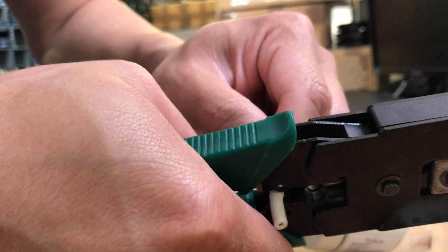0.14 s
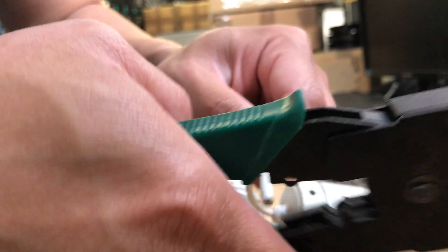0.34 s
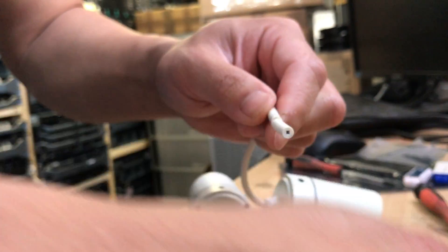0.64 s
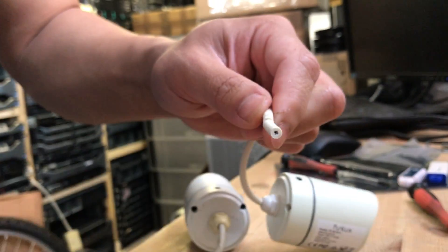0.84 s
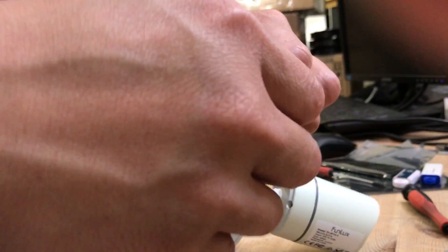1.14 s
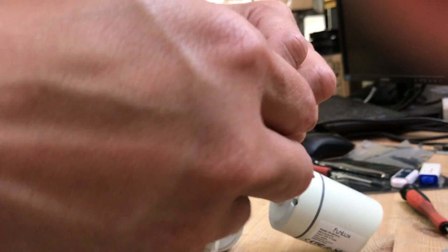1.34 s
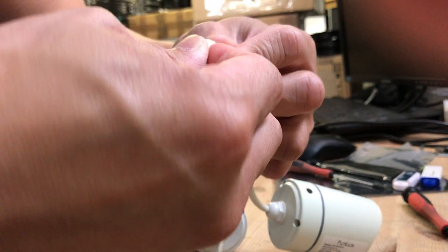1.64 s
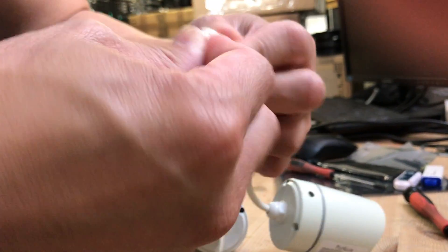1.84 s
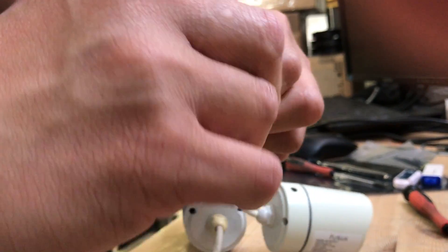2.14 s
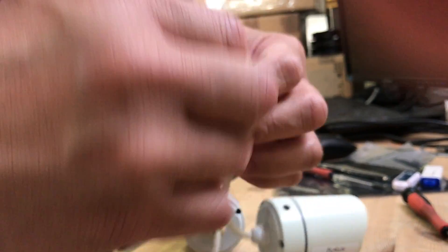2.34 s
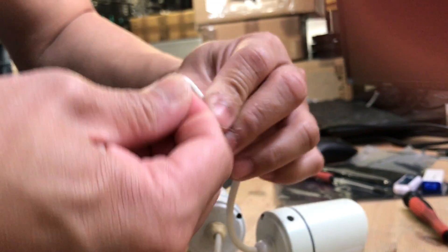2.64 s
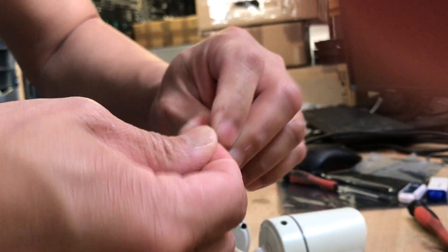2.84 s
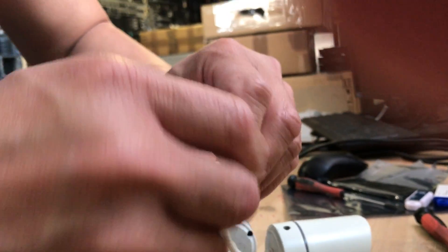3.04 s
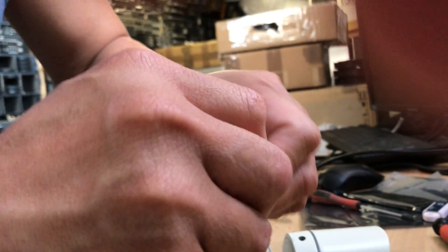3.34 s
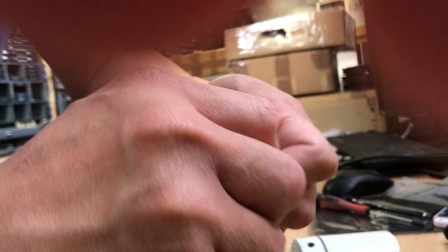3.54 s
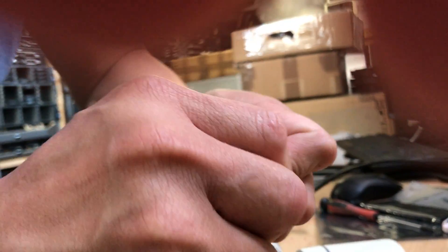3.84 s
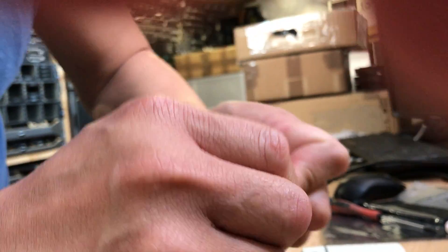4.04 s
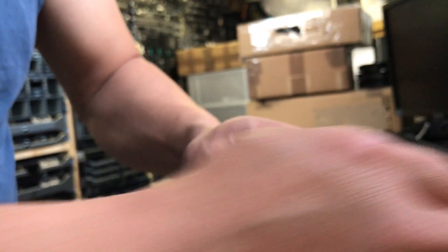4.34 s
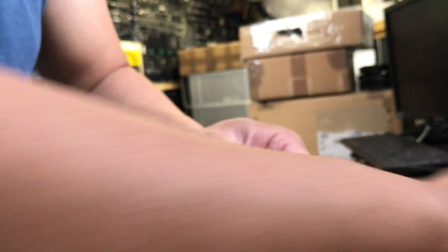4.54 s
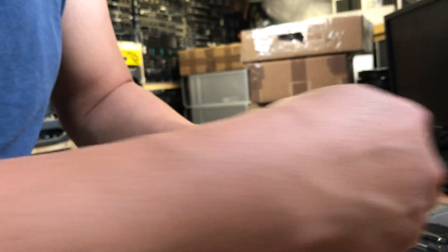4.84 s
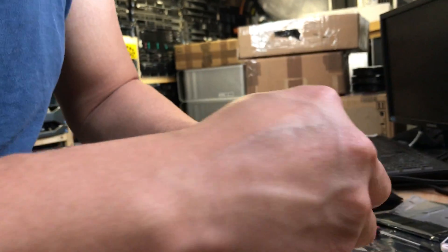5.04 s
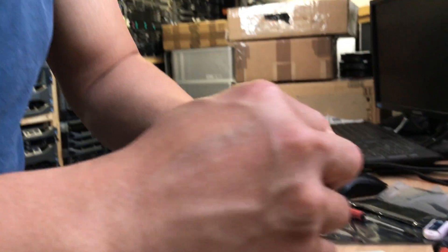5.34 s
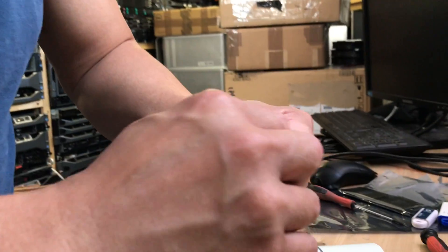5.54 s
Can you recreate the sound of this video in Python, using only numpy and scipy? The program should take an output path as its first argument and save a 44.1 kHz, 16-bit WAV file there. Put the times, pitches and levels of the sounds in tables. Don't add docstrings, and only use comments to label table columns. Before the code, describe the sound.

A quiet workroom with soft fan air and a faint low hum throughout, heard close on a phone microphone with a short dry echo. From 0 to 0.8 s only a few tiny dry fingernail ticks. At about 0.82 s a light metallic click, then at 0.86 s a padded tool handle knocks a wooden bench with a dull thud. Around 1.0 to 1.14 s comes the loudest event: a bounce and a dense burst of steel jaw clacks, spring rattle and low board boom. Faint skin rustle fades by 1.5 s, with a small tick at 1.46 s. At 2.5 s a hollow plastic housing makes a quick double knock, with weak taps after and another softer knock at 2.9 s. Sparse faint ticks follow. Soft muted bumps come at 4.0, 4.2 to 4.33, 4.75 and 4.96 s, with dry clicks near 4.3 s. A tiny plastic snap ends it at 5.6 s.

```python
import sys
import numpy as np
from scipy import signal
from scipy.fft import rfft, irfft
from scipy.io import wavfile
from scipy.ndimage import uniform_filter1d

SR = 44100
rng = np.random.default_rng(int(sys.argv[2]) if len(sys.argv) > 2 else 0)


def boost_factor(decibels):
    exponent = np.asarray(decibels, float) / 20
    return 10 ** exponent


def generate_wav(signal):
    frames = np.transpose(np.atleast_2d(signal))
    scaled = np.clip(frames, -1, 1) * 32767
    pcm = np.round(scaled).astype(np.int16)
    wavfile.write(sys.argv[1], SR, pcm)


N = 250311

# frequency in Hz, level in dB per Hz.
AIR = [(20, -44), (35, -20), (52, 3), (82, -20.5), (110, -14.5), (160, -17.5), (400, -18), (800, -20.5),
       (1300, -21.5), (2500, -26), (4200, -31.5), (5200, -37), (8000, -41.5), (15300, -41)]
# centre in Hz, width in Hz, level in dB.
FAN_BANDS = [(56, 15.8, 7), (103.3, 18, 9), (333.4, 33.3, 11.5), (370.3, 28.3, 5.5), (611.5, 29.3, 13),
             (971, 94, 7.5), (1179, 67, 8.5), (1465, 14, 5.5), (2470, 41, 0), (3440, 41, 12),
             (3662, 12, 12.5), (3750, 1000, 1), (6000, 25, 8.5), (6040, 1300, 3.5), (10570, 570, -8)]
# frequency in Hz, t60 in seconds.
ROOM = [(120, 0.3), (400, 0.12), (1200, .15), (4000, 0.15), (12000, 0.094), (15500, .04)]
# frequency in Hz, level in dB per Hz.
CLOTH = [(1500, -14), (3000, 0), (6000, -0.5), (10000, -5), (15000, -5), (16500, -8.5)]
# start in seconds, length in seconds, level in dB, swell in dB.
RUSTLE_STROKES = [
    (0.757, 0.28, -73, 8),
    (1.13, 0.356, -71.5, 8),
    (2.65, 0.14, -76, -6),
    (2.495, .04, -63, -8),
]
# start in seconds, level in dB, centre in Hz.
NAILS = [(.1145, -55, 8000), (.31, -58, 10000), (.68, -57, 7100), (1.462, -55, 6000), (1.812, -66, 5000),
         (2.475, -55, 12000), (4.195, -64, 8000), (4.894, -63, 7500), (2.703, -60, 9500),
         (2.714, -52, 9000), (2.848, -58, 11000), (2.868, -48, 7000), (3.005, -60, 9000), (3.1, -64, 10000),
         (3.245, -57, 9000), (4.27, -48, 9600), (4.315, -53, 8000), (4.3257, -49.5, 8000),
         (4.82, -61, 9000), (5.5927, -47, 5000)]
# start in
# seconds, level in dB, centre in Hz, t60 in seconds.
SPRINGS = [(5.596, -48, 3000, .055), (0.82, -33, 5500, 0.0072), (.917, -37.5, 10300, 0.014),
           (.98, -48, 11000, .01), (.987, -38, 4500, 0.03), (.998, -47, 13000, .012),
           (1.097, -35, 10900, 0.011), (1.1314, -12.5, 1800, 0.0038), (4.271, -35, 1700, 0.0045),
           (4.327, -43, 1200, 0.014)]
# start in seconds, level in dB, centre in Hz, t60 in seconds.
PINGS = [(1.0645, -29, 15500, .016), (1.042, -36, 11200, .012), (.9125, -58, 14000, .008),
         (1.1345, -36, 5100, 0.014), (1.46, -42, 2050, 0.021), (1.4605, -42, 2550, .018),
         (1.461, -54, 4300, 0.014), (2.4945, -25, 4450, .012), (2.508, -52, 4150, .045),
         (.988, -46, 5400, .015), (2.878, -62, 12500, .02), (2.4945, -46, 7600, .014),
         (2.902, -57, 4270, 0.03), (2.868, -50, 2700, 0.011), (3.515, -59, 7000, 0.013),
         (3.67, -65, 7000, .012), (5.531, -60, 4300, 0.0094)]
# start in seconds, level in dB, ring in Hz, t60 in seconds.
BUMPS = [(2.497, -24, 200, .07), (.822, -40, 95, .06), (4.272, -40, 90, .05), (4.326, -42, 110, .05),
         (1.45, -53, 200, 0.093), (0.821, -29.5, 695, 0.015), (3.245, -44, 130, 0.063),
         (3.787, -44, 355, 0.05), (3.995, -34, 545, 0.037), (4.005, -47.5, 195, 0.11),
         (4.178, -40, 130, 0.052), (4.21, -36, 540, 0.062), (4.219, -35.5, 325, 0.077),
         (4.234, -36, 580, 0.025), (4.271, -32, 250, 0.019), (4.309, -36, 330, 0.07),
         (4.324, -32.5, 260, 0.026), (4.748, -40.5, 610, 0.011), (4.75, -31.5, 349, 0.056),
         (4.762, -44, 192, 0.14), (4.894, -45, 327, 0.063), (4.959, -33.5, 550, 0.038),
         (5.532, -47.5, 179, 0.096), (5.573, -52, 250, .05)]
# start in seconds, level in dB, ring in Hz, t60 in seconds.
BOOMS = [(.872, -16, 128, .1), (.89, -26, 150, .04), (1.066, -7, 320, .035), (1.011, -18, 190, 0.11),
         (1.042, -12, 190, 0.036), (1.062, -12, 125, .11), (1.0673, -0.5, 191, 0.046),
         (1.085, -9.5, 170, .045), (1.104, -21, 174, 0.037), (1.123, -11, 203, 0.047),
         (1.134, -17.5, 160.3, 0.073), (1.09, -25.5, 57.3, 0.23)]
# frequency in Hz, level in dB, t60 in seconds.
CLIP = [(2385, -32, 0.008), (1270, -47, 0.011), (820, -44, 0.0076), (3740, -49, .008), (6070, -43, 0.005)]
# frequency in Hz, level in dB, t60 in seconds, rise in ms.
HANDLE = [(68.5, -39.5, 0.24, 17), (143, 1, .09, 18), (190, 5.5, 0.06, 9.6), (260, -5.5, 0.047, 7.1),
          (325, -9, 0.087, 4.8), (536, -3, 0.041, 0.81), (619, 0, 0.033, 4.3), (723, 0, 0.042, 2.6),
          (900, -8, 0.046, 1), (1097, -14, 0.06, .8), (1505, -22, 0.085, 0.9), (1800, -43.5, .03, .6),
          (2430, -21.5, 0.01, 0.45)]
# frequency in Hz, level in dB, t60 in seconds, rise in ms.
JAWS = [(296, 0, 0.054, 0.83), (329, 0.5, 0.051, 1), (462, -7, 0.056, 2.4), (596.5, -2, 0.047, 1.4),
        (717, -5, 0.045, 1.8), (917, -3, 0.054, 1.3), (1107, -6.5, 0.048, 2.3), (1150, -2, 0.035, 0.91),
        (1366, -12, 0.062, 0.67), (1640, -7.5, 0.05, 0.25), (1750, -0.5, 0.02, 0.41),
        (2085, -10.5, 0.021, 0.26), (2350, -12, 0.046, 0.37), (2700, -18.5, 0.046, 0.37),
        (3184, -16.5, 0.037, 0.44), (3835, -22, 0.082, .4), (4270, -20, 0.054, .4),
        (5280, -21.5, 0.031, .3), (6440, -38, 0.018, .3), (11400, -31.5, 0.01, .3), (15300, -27, 0.008, .3)]
# frequency in Hz, level in dB, t60 in seconds, rise in ms.
HOUSING = [(85, -30, 0.14, 15), (136, -24.5, 0.17, 19), (210, -12, 0.08, 8.5), (338.3, -2.5, 0.077, 3.1),
           (460, -11.5, 0.071, 1.9), (545, 4, 0.033, 2.5), (638, 5.5, 0.015, 1.04), (830, -12, 0.035, 0.94),
           (963, 1.5, 0.035, 3.3), (1066, -2.5, 0.059, 2.9), (1250, -18, 0.066, 0.74),
           (1467, -20.5, 0.06, 1.1), (1674, -18, 0.05, .8), (1883, -14.5, 0.032, 0.31),
           (2170, -20, 0.024, 0.35), (2510, -31, 0.038, 0.43)]
# frequency in Hz, level in dB per Hz.
CRACK = [(470, -28.5), (800, -4.5), (1970, -8), (4710, -13), (5990, -5), (6800, -14.5), (8020, -24),
         (11100, -21), (14500, -26.5), (15500, -17.5), (16500, -29)]
# frequency in Hz, level in dB per Hz.
THUD = [(500, -30), (900, -10), (2000, -6), (4500, 2), (6000, -20), (8000, -15), (15500, -26)]
# start in seconds, level in dB, bass in dB, tilt in dB per octave, crack in dB.
HANDLE_BLOWS = [
    (0.8504, -38.5, -9, -7.5, -15),
    (0.8637, -9.5, -10, -5, -20),
    (0.8669, -16, -9, -7, -11),
    (1.0042, -22.5, -8, -1.5, -33),
]
# start in seconds, level in dB, bass in dB, tilt in dB per octave, crack in dB.
JAW_BLOWS = [(1.04, -15, 3, 0.79, -5), (1.044, -16, -7, 0.35, -13), (1.064, -16, 11, 1.2, 1.5),
             (1.067, -10, -6, 0.85, -14), (1.0719, -19, -1.5, -0.78, -14), (1.076, -19, 11, -0.95, -24),
             (1.088, -23.5, 0, -1.3, -11), (1.123, -23, -10, .1, -22), (1.1318, -17, -10, 1.8, -9),
             (1.14, -29.5, 7, -0.72, -3)]
# start in seconds, level in dB, bass in dB, tilt in dB per octave, crack in dB.
HOUSING_BLOWS = [(2.4933, -14, 7.5, 0.8, -41), (2.5054, -19, 13, 2.5, -31), (2.518, -36, 2, 4, -25),
                 (2.579, -45, -5, -11, -35), (2.587, -37.5, -2, -6.5, -30), (2.613, -40.5, 6, -4, -28),
                 (2.898, -22.5, -2, -2.5, -38), (2.905, -26, -1, -0.5, -34)]
LOOSE = {"handle": .15, "jaws": .3, "housing": .05}
CHATTER_MS = {"handle": 2.5, "jaws": 2.7, "housing": 2.6}


def evened(x):
    return x / np.sqrt(np.mean(x ** 2) + 1e-20)


def read(points, hz):
    f, value = np.transpose(points)
    return np.interp(np.log(hz + 1), np.log(f + 1), value)


def add(mix, s, sound):
    part = mix[round(s * SR):][:len(sound)]
    part += sound[:len(part)]


def coloured(db, size):
    hz = np.fft.rfftfreq(size, 1 / SR)
    spectrum = rfft(rng.standard_normal(size)) * boost_factor(db(hz))
    return evened(irfft(spectrum, size))


def ring(t, hz, db, t60, rise_ms, wander=0):
    decay = boost_factor(db - 60 * (t / t60) ** 0.93)
    rise = (1 - np.exp(-1500 * t / rise_ms)) ** 2
    return decay * rise * np.sin(2 * np.pi * hz * t + wander)


def air():
    frames, hz = N // 512 + 5, np.fft.rfftfreq(2048, 1 / SR)
    real, imag, patches = rng.standard_normal((frames, 1025, 3)).T
    patches = uniform_filter1d(patches, size=20, axis=0)
    patches = evened(uniform_filter1d(patches, size=8, axis=1))
    hums_db = sum(db / (1 + ((hz - f) / (0.5 * width)) ** 2) for f, width, db in FAN_BANDS)
    level_db = (read(AIR, hz) + hums_db)[:, None] + 0.9 * patches
    spectra = (real + 1j * imag) * boost_factor(level_db)
    wash = signal.istft(spectra, nperseg=2048, noverlap=1536)[1][:N]
    return boost_factor(-60.5 + 0.09 * np.arange(N) / SR) * evened(wash)


def hum():
    t = np.arange(N) / SR
    drift_hz = 3.02 * evened(uniform_filter1d(rng.standard_normal(N), size=9000))
    phase = 2 * np.pi * np.cumsum(54.0 + drift_hz) / SR
    return boost_factor(-68 + 1.6 * t) * np.sin(phase)


def room(x):
    taps = np.zeros(SR // 2)
    at = np.arange(200, SR // 2 - 20, 20)
    taps[at + rng.integers(0, 20, len(at))] = rng.choice([-1., 1.], len(at))
    hz, t, z = signal.stft(taps, SR, nperseg=256)
    decay = boost_factor(-60 * t / read(ROOM, hz)[:, None])
    tail = signal.istft(z * decay, SR, nperseg=256)[1]
    return signal.fftconvolve(x, tail / np.linalg.norm(tail))[:N]


def rustle():
    t, out = np.arange(N) / SR, np.zeros(N)
    hiss = coloured(lambda f: read(CLOTH, f), size=N)
    grains = boost_factor(0.8 * evened(uniform_filter1d(rng.standard_normal(N), size=150)))
    for s, length, db, swell_db in RUSTLE_STROKES:
        fade = np.clip(np.minimum(t - s, s + length - t) / 0.016, 0, 1)
        stroke_db = db - 2.0 + swell_db * np.clip((t - s) / length, 0, 1)
        out += fade * boost_factor(stroke_db) * hiss * grains
    return out


def tick(s, db, hz, width_hz, t60):
    t = np.arange(2048) / SR
    band_db = lambda f: -10 * np.log10(1 + ((f - hz) / width_hz) ** 4)
    click = np.roll(irfft(boost_factor(band_db(np.fft.rfftfreq(len(t), 1 / SR)))), 24)
    click = click / click.max() * (t < 0.01)
    grit = coloured(band_db, size=len(t)) * boost_factor(-60 * t / t60) * np.minimum(t / 0.0003, 1)
    return s, boost_factor(db - 3.5) * (grit + 0.99 * click)


def bump(s, db, hz, t60, rise_ms, overtone_db):
    t = np.arange(SR // 8) / SR
    low = ring(t, hz, db, t60, rise_ms)
    overtone = ring(t, 1.86 * hz, db + overtone_db, 0.58 * t60, 0.5 * rise_ms)
    return s, low + overtone


def snap():
    t = np.arange(SR // 8) / SR
    return 5.5931, sum(ring(t, hz, db + 15, t60, rise_ms=1.3) for hz, db, t60 in CLIP)


def blow(modes, colour, slack, s, db, bass_db, tilt_db, crack_db, chatter_ms):
    t = np.arange(SR // 4) / SR
    hz, mode_db, t60, rise_ms = np.transpose(modes)[:, :, None]
    spot_db = bass_db / (1 + (hz / 260) ** 4) + tilt_db * np.log2(hz / 600)
    loose, side = rng.uniform(-1, 1, (2, len(modes), 1))
    walk = rng.standard_normal((len(modes), len(t))).cumsum(axis=1)
    walk = uniform_filter1d(uniform_filter1d(walk, size=40), size=40)
    rattle = np.sqrt(slack * hz / SR) * (walk - walk[:, :1]) * (hz > 400)
    rings = ring(t, hz * (1 + 0.019 * loose), mode_db + spot_db, t60, rise_ms, rattle)
    body = (np.sign(side) * rings).sum(0)
    crack = coloured(lambda f: read(colour, f), size=len(t))
    crack *= np.exp(-(1000 * t / chatter_ms) ** 2)
    dull_db = lambda f: read(colour, f) - 2.6 * np.log2(1 + f / 1500) - 9 * (f / 15500) ** 8
    scatter = coloured(dull_db, size=len(t)) * boost_factor(-15.5 - 60 * t / 0.1)
    contact = boost_factor(crack_db) * (crack + scatter) * np.minimum(t / 0.00046, 1)
    return s, boost_factor(db - 1.5) * (body + contact)


def scene():
    bench = np.zeros(N)
    for s, db, hz in NAILS:
        add(bench, *tick(s, db, hz, width_hz=0.62 * hz, t60=0.012))
    for rows, width in ((SPRINGS, 0.62), (PINGS, 0.12)):
        for s, db, hz, t60 in rows:
            add(bench, *tick(s, db, hz, width * hz, t60))
    for rows, rise, overtone_db in ((BUMPS, 0.057, -8), (BOOMS, 0.13, -11.5)):
        for s, db, hz, t60 in rows:
            add(bench, *bump(s, db, hz, t60, 1000 * rise * t60, overtone_db))
    bodies = ((HANDLE, CRACK, "handle", HANDLE_BLOWS),
              (JAWS, CRACK, "jaws", JAW_BLOWS),
              (HOUSING, THUD, "housing", HOUSING_BLOWS))
    for modes, colour, name, blows in bodies:
        for row in blows:
            add(bench, *blow(modes, colour, LOOSE[name], *row, CHATTER_MS[name]))
    echo = boost_factor(-15.5) * room(bench)
    add(bench, *snap())
    return (bench + echo + rustle() + air() + hum())[None]


def top_cut(x):
    return signal.sosfilt(signal.butter(12, 16990, fs=SR, output="sos"), x)


def record(dry):
    edge = signal.firwin(255, 15850, window=("kaiser", 5), fs=SR)
    mix = signal.oaconvolve(dry, edge[None], "same")
    return top_cut(mix)


dry = scene()
out = record(dry)
generate_wav(out)
```